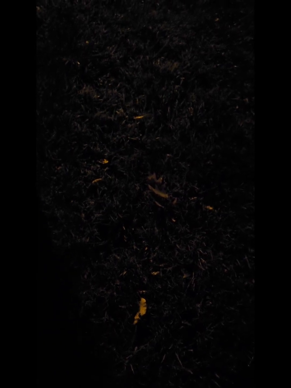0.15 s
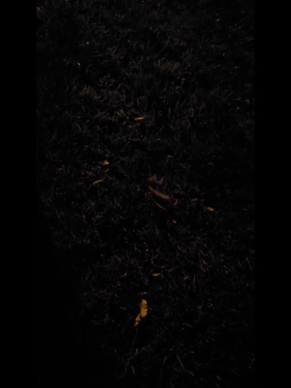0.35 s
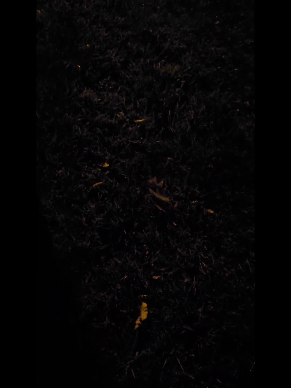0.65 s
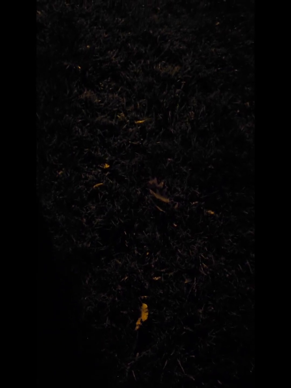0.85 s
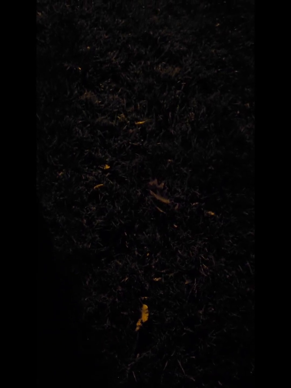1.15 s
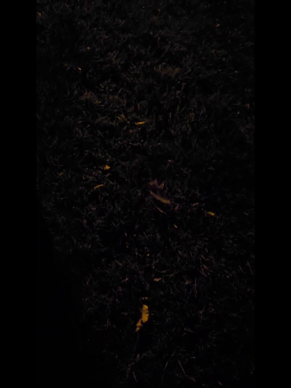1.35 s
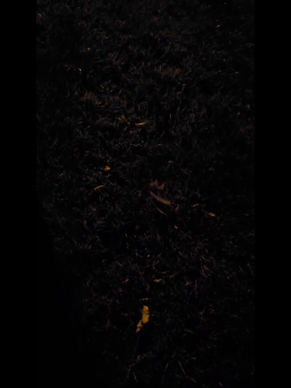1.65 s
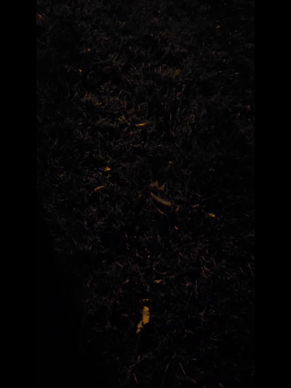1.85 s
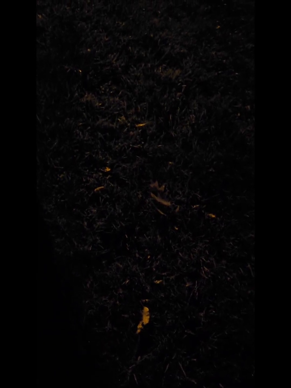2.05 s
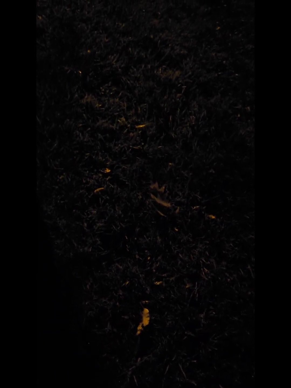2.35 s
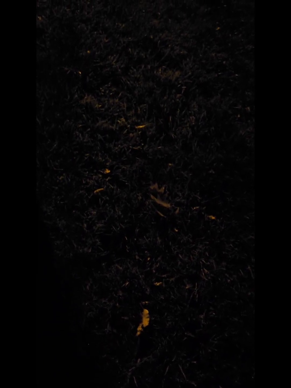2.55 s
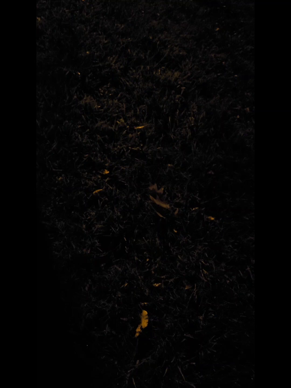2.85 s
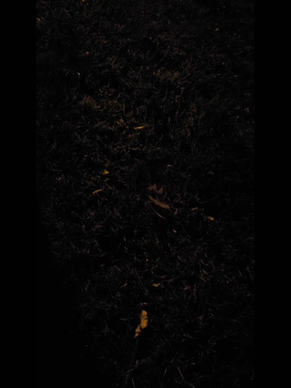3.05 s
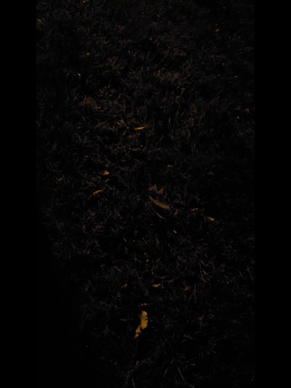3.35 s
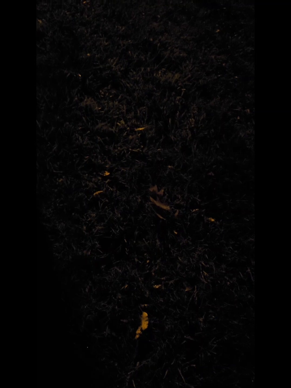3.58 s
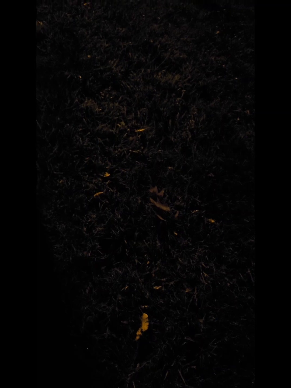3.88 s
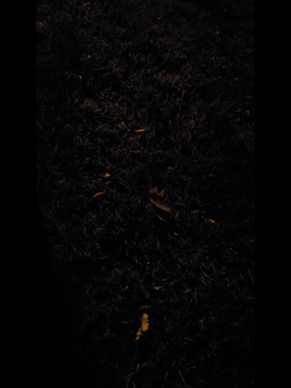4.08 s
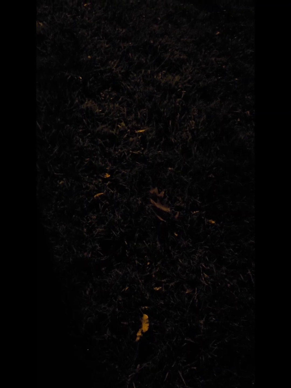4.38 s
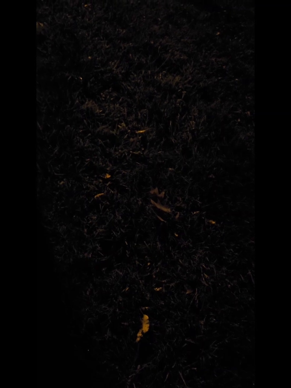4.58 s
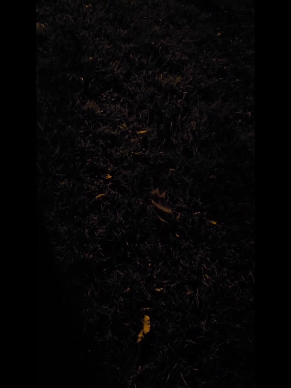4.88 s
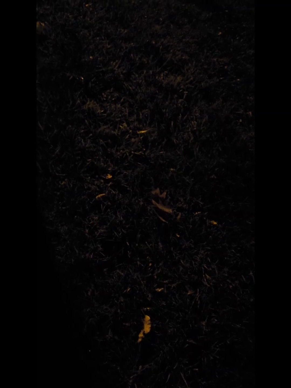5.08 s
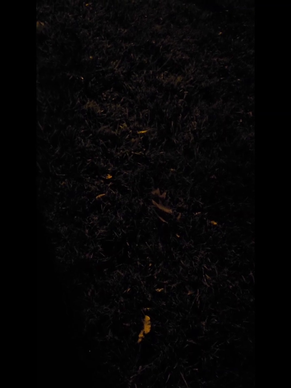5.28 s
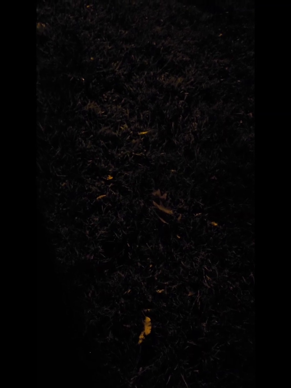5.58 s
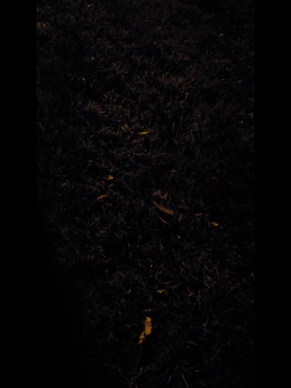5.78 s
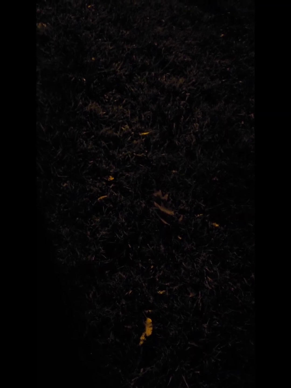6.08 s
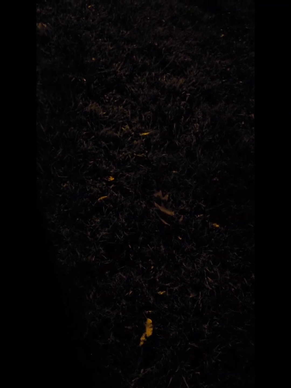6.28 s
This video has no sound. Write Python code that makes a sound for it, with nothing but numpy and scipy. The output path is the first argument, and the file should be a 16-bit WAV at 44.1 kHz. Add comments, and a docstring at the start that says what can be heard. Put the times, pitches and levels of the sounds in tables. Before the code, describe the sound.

Crickets trill and chirp at high pitch on a night lawn while a light breeze buffets the microphone with a low, uneven rumble.

```python
"""A lawn at night. A near cricket scrapes its wings in stuttering bouts, each stroke a falling whistle
near 4.8 kHz. Two small crickets chirp higher up, another trills far to the left, insect choruses and
tree crickets drone, and a distant katydid rasps in pairs. Light gusts buffet the two microphone ports
unevenly, and dry grass ticks over a faint far rumble and a road hum that comes and goes."""
import sys
import numpy as np
from scipy import signal
from scipy.fft import rfft, irfft, next_fast_len
from scipy.io import wavfile
from scipy.ndimage import map_coordinates

SR = 44100
rng = np.random.default_rng(int(sys.argv[2]) if len(sys.argv) > 2 else 0)


def to_wav(s):
    """Save 16-bit WAV."""
    ch = np.atleast_2d(s).T  # columns
    pcm = np.round(np.clip(ch, -1, 1) * 32767)  # PCM
    wavfile.write(sys.argv[1], SR, pcm.astype(np.int16))


N = 283563
TIME = np.arange(N) / SR


def amp(db):
    """Decibels to gain."""
    return 10 ** (np.asarray(db) / 20)


def unit(x):
    """Scale to rms 1."""
    return x / np.sqrt(np.mean(x ** 2) + 1e-20)


def along(points, hz):
    """Read (frequency, value) points on a log frequency axis."""
    freqs, values = np.transpose(points)
    return np.interp(np.log(hz + 1), np.log(freqs + 1), values)


def fader(points):
    """Ride a level through (time, level) points, one value a sample."""
    return np.interp(TIME, *np.transpose(points))


def wobble(rate):
    """A smooth random curve, rate knots a second."""
    knots = rng.standard_normal(int(N * rate / SR) + 4)
    fine = np.arange(0, len(knots) - 1, .125)
    return np.interp(TIME * rate, fine, map_coordinates(knots, [fine]))


def swells(times, levels_db, width_s):
    """Bell-shaped envelopes at the given times."""
    envelope = np.zeros(N)
    for s, db in zip(times, levels_db):
        i = np.arange(max(int((s - 5 * width_s) * SR), 0), min(int((s + 5 * width_s) * SR), N))
        envelope[i] += amp(db) * np.exp(-.5 * ((i / SR - s) / width_s) ** 2)
    return envelope


def filtered(x, response):
    """Pass x through a complex frequency response."""
    size = next_fast_len(N + 4096, real=True)
    return irfft(rfft(x, size) * response(np.fft.rfftfreq(size, 1 / SR)), size)[..., :N]


def noise(spectrum):
    """Two unrelated noises of rms 1, rolling off steeply past the spectrum's ends."""
    low_hz, high_hz = spectrum[0][0], spectrum[-1][0]
    skirts = lambda hz: 1 / (1 + (low_hz / (hz + 1)) ** 8) / (1 + (hz / high_hz) ** 16)
    return unit(filtered(rng.standard_normal((2, N)), lambda hz: amp(along(spectrum, hz)) * skirts(hz)))


def pan(balance_db):
    """Left and right gains; positive leans left."""
    return amp(np.array([[.5], [-.5]]) * balance_db)


def delay(hz, lag_samples):
    """Left and right responses for a sound that reaches the left port later."""
    turn = np.exp(-1j * np.pi * hz / SR * lag_samples)
    return np.array([turn, turn.conj()])


def arrive(x, lag_samples):
    """A sound from one side reaches the far port later (positive: left is later)."""
    return filtered(x, lambda hz: delay(hz, lag_samples))


def from_left(pair, direct):
    """Far sound: a direct share that reaches the left port first, the rest diffuse."""
    left, right = arrive(pair[0], lag_samples=-21)
    return np.array([left, direct * right + np.sqrt(1 - direct ** 2) * pair[1]])


def scatter(x, t60, wet_db):
    """Add the diffuse answer of grass and bushes, different at each port."""
    t = np.arange(SR // 3) / SR
    tail = rng.standard_normal((2, len(t))) * amp(-60 * t / t60)
    echo = signal.fftconvolve(x, tail, axes=1)[:, :N]
    return x + amp(wet_db) * unit(echo) * np.sqrt(np.mean(x ** 2))


def strokes(rows, fall, edge):
    """Envelope and phase of wing strokes: the wing slows as it closes, so the pitch falls."""
    # rows: (middle [s], length [s], pitch [Hz], level [dB])
    rows = rows[np.argsort(rows[:, 0])]
    borders = (rows[1:, 0] + rows[:-1, 0]) / 2
    middle, length, hz, db = rows[np.searchsorted(borders, TIME)].T
    travel = np.clip(2 * (TIME - middle) / length, -1, 1)
    envelope = amp(db) * np.abs(np.cos(np.pi / 2 * travel)) ** edge
    pitch = hz * (1 - fall * (travel + .3 * travel ** 2))
    return envelope, 2 * np.pi * np.cumsum(pitch) / SR


# colour of the far rumble and of a far insect's sizzle: (frequency [Hz], density [dB])
RUMBLE_EQ = [(25, -48), (55, -1), (90, -8), (150, -7.5), (215, -11.5), (265, -11), (300, -15.5), (350, -18),
             (550, -21.5), (800, -26), (1200, -26), (1700, -31.5), (2700, -34), (3600, -62), (9000, -48)]
SIZZLE_EQ = [(3000, -22), (9000, -7.5), (13000, -2), (14500, 5), (15500, 16)]
# how alike the rumble is at the two ports: (frequency [Hz], correlation [-1 to 1])
RUMBLE_LIKENESS = [(40, 0.82), (150, 1), (300, 0.86), (600, 0.52), (1200, -0.14), (2500, -0.45)]
# the rumble's slow ebb: (time [s], level [dB])
RUMBLE_FADER = [(0, -50.5), (1.4, -51.5), (4.2, -52), (6.43, -53.5)]


def night_bed():
    """A far rumble, centred in the bass, and a far insect's faint, very high sizzle to the left."""
    def mid_side(hz):
        angle = np.arccos(along(RUMBLE_LIKENESS, hz)) / 2
        return np.array([np.cos(angle), np.sin(angle)])
    mid, side = filtered(noise(RUMBLE_EQ), mid_side)
    rumble = amp(fader(RUMBLE_FADER) + 1.33 * wobble(4.84)) * unit(np.array([mid + side, mid - side]))
    return rumble + amp(-70.5) * noise(SIZZLE_EQ) * pan(7.6)


# the road hum comes and goes: (time [s], level [dB])
HUM_FADER = [(0, -67.5), (3.9, -74.5), (4.4, -64), (5.0, -60.5), (5.3, -75), (6.43, -74)]


def road_hum(hum_hz=301):
    """A wavering low note from distant traffic, alike at both ports."""
    phase = 2 * np.pi * hum_hz * TIME + 1.65 * wobble(18)
    return amp(fader(HUM_FADER)) * unit(amp(2.1 * wobble(16)) * np.sin(phase))


def far_trill(pitch_hz, period_s, fall, wet_db):
    """An unbroken run of wing strokes at rms 1, blurred by distance."""
    beats = np.arange(0, N / SR + period_s, period_s)
    late, sharp, loud = rng.standard_normal((len(beats), 3)).T
    lengths = np.full(len(beats), .68 * period_s)
    rows = np.c_[beats + .0015 * late, lengths, pitch_hz * (1 + .01 * sharp), 1.5 * loud]
    envelope, phase = strokes(rows, fall, edge=0.28)
    return unit(scatter(pan(0) * envelope * np.sin(phase), t60=0.15, wet_db=wet_db))


# colour of the two far choruses: (frequency [Hz], density [dB])
HIGH_CHORUS_EQ = [(3500, -22.5), (4200, -18), (4800, -8.5), (5250, -13), (5550, -8.5), (5900, -1),
                  (6080, -1.5), (6350, -26), (6700, -25.5), (7400, -15), (8600, -37)]
LOW_CHORUS_EQ = [(1600, -4), (1950, -8.5), (2140, 3.5), (2290, -6), (2460, 3.5), (2650, -0.5),
                 (2850, -11.5), (3150, -3), (3450, -12)]
# trills within the high chorus: (pitch [Hz], stroke period [s], level against the chorus [dB])
CHORUS_TRILLS = [(5940, 0.017, -2), (5600, 0.023, -2.5)]
# the high chorus sinks where its singers pause: (time [s], relative level [dB])
HIGH_CHORUS_FADER = [(0, -60), (0.55, -58), (0.75, -63.5), (0.9, -57), (1.05, -64.5), (1.27, -58),
                     (1.43, -67.5), (1.6, -57), (1.78, -63), (1.95, -58.5), (3.7, -60), (4.7, -61),
                     (5.75, -62), (6.43, -62)]


def choruses():
    """Many far insects merge into two shimmering bands; two trills stand a little out of the high one."""
    shimmer = amp(0.5 + 0.86 * wobble(16) + 3.3 * wobble(100))
    high = shimmer * from_left(noise(HIGH_CHORUS_EQ), direct=0.6)
    for hz, period_s, db in CHORUS_TRILLS:
        high += amp(db + 0.7 * wobble(13)) * far_trill(hz, period_s, fall=.025, wet_db=12)
    low_gain = amp(-66 + 0.91 * wobble(4.86) + 0.88 * wobble(60))
    low = low_gain * from_left(noise(LOW_CHORUS_EQ), direct=0.39)
    return amp(fader(HIGH_CHORUS_FADER)) * high * pan(-1.8) + low * pan(-9)


# one held note for each tree cricket: (pitch [Hz], relative level [dB])
TREE_NOTES = [(2983, -69.5), (3074, -65), (3170, -70.5)]


def tree_crickets():
    """Thin, slightly unsteady notes from far to the left."""
    notes = np.zeros(N)
    for hz, db in TREE_NOTES:
        flutter = amp(2.5 * wobble(15) + 3 * wobble(70))
        notes += amp(db - 3.5) * unit(flutter * np.sin(2 * np.pi * hz * TIME + 1.2 * wobble(30)))
    return arrive(notes, lag_samples=-20.5)


# the far cricket fades away and comes back: (time [s], relative level [dB])
FAR_CRICKET_FADER = [(0, -60), (1.6, -78), (3.8, -61.5), (4.8, -65), (5.7, -66), (6.43, -63)]


def far_cricket():
    """A cricket of the near one's kind trills farther off to the left."""
    trill = far_trill(pitch_hz=4970, period_s=.0213, fall=.05, wet_db=-6)
    return amp(fader(FAR_CRICKET_FADER) - 1.5) * pan(9) * trill


# gusts on the ports: (start [s], end [s], left level [dB], right level [dB])
GUST_CUES = [(0, .29, -32, -30.5), (.085, .17, -20, -26), (0.306, .62, -41, -35), (0.496, 0.833, -32, -41),
             (0.818, 1.25, -38.5, -46), (1.277, 1.63, -41.5, -42.5), (1.998, 2.82, -40, -58),
             (2.853, 3.401, -39, -39), (3.424, 3.657, -39.5, -31.5), (3.675, 3.919, -41.5, -45.5),
             (4.081, 4.745, -41.5, -45.5), (4.391, 4.523, -30.5, -50), (5.5, 6.305, -52, -46.5),
             (5.904, 6.0, -40, -56), (6.308, 6.409, -39.5, -41)]
# sharp eddies that thud on a port: (time [s], level [dB], left minus right [dB])
THUD_CUES = [(.085, -39, 11), (0.583, -38.5, 15), (0.712, -36.5, 9.5), (0.778, -41, 15.5), (0.908, -38, 8),
             (2.987, -35, 15.5), (3.179, -38, 16), (3.501, -42, -4)]
# colour of the buffeting and of the thuds: (frequency [Hz], density [dB])
BUFFET_EQ = [(20, -27), (32, -10), (48, 2.5), (66, 3.5), (95, -5.5), (145, -11), (190, -23.5), (280, -21.5),
             (360, -33), (600, -50)]
THUD_EQ = [(70, 12), (130, 6.5), (240, 1), (330, -19), (600, -41)]


def breeze(ramp_s=0.051, calm_db=-52.5, lump_db=2.3, thud_width_s=0.0095):
    """Gusts rise, hold and fall; their eddies strike each port on its own, and the sharpest thud."""
    power = amp(calm_db) ** 2  # the air still stirs between gusts
    for start, end, left_db, right_db in GUST_CUES:
        hold = np.clip(np.minimum(TIME - start, end - TIME) / ramp_s + .5, 0, 1)
        power = power + (amp([[left_db], [right_db]]) * hold) ** 2
    lumps = amp(lump_db * np.array([wobble(16), wobble(16)]))
    buffet = np.sqrt(power) * unit(lumps * noise(BUFFET_EQ))
    times, db, balance_db = np.transpose(THUD_CUES)
    thuds = np.array([swells(times, db + side * balance_db, thud_width_s) for side in (.5, -.5)])
    return buffet + thuds * noise(THUD_EQ)


# the near cricket's run lengths, each entry equally likely: (length [strokes])
STROKES_PER_RUN = [2, 2, 3, 3, 3, 3, 3, 4, 4, 4, 5, 6]
STROKE_GAP_S, HITCH_S = 0.018, 0.011  # nominal spacing within a run; extra pause between runs


def stroke_times(first, last):
    """A bout is a chain of short runs of evenly spaced strokes, with an uneven hitch after each run."""
    runs = rng.choice(STROKES_PER_RUN, size=60)
    hitches = np.cumsum(HITCH_S * rng.uniform(.5, 1.5, size=60))
    offsets = np.arange(runs.sum()) * STROKE_GAP_S + np.repeat(hitches - hitches[0], runs)
    final = max(np.argmin(np.abs(offsets - (last - first))), 1)
    return first + offsets[:final + 1] * (last - first) / offsets[final]  # stretched to fill the bout


# bouts of the near cricket's trill: (first stroke [s], last stroke [s])
TRILL_BOUTS = [(0.02, 0.949), (1.633, 1.653), (1.788, 3.762), (3.905, 4.718), (4.869, 5.161),
               (5.251, 5.632)]
# how hard it sings: (time [s], relative stroke level [dB])
TRILL_EFFORT = [(0, -34.5), (0.95, -34), (1.63, -37.5), (1.8, -39), (2.05, -34.5), (3.3, -34.3),
                (3.76, -34), (3.9, -38), (4.05, -34.5), (4.45, -36), (4.68, -38.5), (4.9, -39.5),
                (5.05, -35.5), (5.63, -35)]
# harmonics of its wing: (multiple [x pitch], relative level [dB], left minus right [dB])
WING_HARMONICS = [(1, 0.5, 1.7), (2, -23.5, 2), (3, -18, 12.5)]
# colour of file on scraper: (frequency [Hz], density [dB])
SCRAPE_EQ = [(3400, -24.5), (4100, -14.5), (4700, 0), (5900, 5.5), (6700, -9), (7500, -9.5), (8800, -17),
             (10600, -15.5), (11900, -10.5), (13200, -17), (14600, -8), (15800, -9)]
# the scrape's treble favours the left port: (frequency [Hz], left minus right [dB])
SCRAPE_PAN = [(9800, 3), (12000, 1.5), (14500, 14)]
# the song bends round the microphone's housing: (frequency [Hz], lag of the left port [samples])
HOUSING_LAG = [(4800, 10.1), (5200, 11.35), (9600, 11.45), (14500, 11.3)]


def near_cricket(stroke_hz=4820, length_s=0.0114, sag_per_db=0.004, slip_db=2.4):
    """Wing strokes whistle, and a few slip; uneven file teeth roughen the tone and add a scrape."""
    beats = np.concatenate([stroke_times(first, last) for first, last in TRILL_BOUTS])
    late, stretch, sharp, slip = rng.standard_normal((500, 4))[:len(beats)].T
    db = np.interp(beats, *np.transpose(TRILL_EFFORT)) - slip_db * (np.abs(slip) - 1)
    # weak strokes are also shorter and lower
    effort_db = db - np.median(db)
    lengths = np.minimum(length_s * amp(0.344 * effort_db + 1.1 * stretch), STROKE_GAP_S)
    pitches = stroke_hz * (1 + sag_per_db * np.minimum(effort_db, 0) + 0.005 * sharp)
    envelope, phase = strokes(np.c_[beats + .0007 * late, lengths, pitches, db], fall=.046, edge=0.66)
    # grit from the uneven teeth
    phase += .14 * wobble(1100)
    envelope *= amp(1.65 * wobble(450))
    whistle = sum(amp(level - 0.4) * pan(side) * np.sin(k * phase) for k, level, side in WING_HARMONICS)
    scrape = amp(-18) * filtered(noise(SCRAPE_EQ)[0], lambda hz: pan(along(SCRAPE_PAN, hz)))
    song = filtered(envelope * (whistle + scrape), lambda hz: delay(hz, along(HOUSING_LAG, hz)))
    # the ground's answer is short, the bushes' lingers
    grounded = scatter(song, t60=0.017, wet_db=-13)
    return scatter(grounded, t60=0.18, wet_db=-11.5)


# katydid calls: (middle of the first rasp [s], relative level [dB])
KATYDID_CUES = [(.095, -54.5), (1.0, -55.5), (1.975, -56.5), (2.78, -56), (3.605, -55.5), (4.474, -56),
                (5.395, -55.5), (6.321, -56.5)]
# colour of a rasp: (frequency [Hz], density [dB])
RASP_EQ = [(1400, -25), (1780, -3.5), (2150, -3.5), (2500, -6), (2900, -10.5), (3300, -14)]


def katydid(width_s=0.047, gap_s=0.18):
    """Paired rasps from far off, their edges softened by the trees."""
    times, db = np.transpose(KATYDID_CUES)
    pairs = swells(times, db, width_s) + swells(times + gap_s, db, width_s)
    envelope = pairs * amp(-5 + 0.37 * wobble(130))
    return envelope * from_left(noise(RASP_EQ), direct=0.32) * pan(-4.5)


def chirper(starts, pitch_hz, period_s, fall, balance_db, wet_db, count=7):
    """A small cricket: every chirp is a swelling burst of quick strokes."""
    k = np.arange(count)
    swell_db = 5 * (np.sin(np.pi * (k + 1) / (count + 1)) - 1)
    chirps = []
    for start in starts:
        pitches = pitch_hz * (1 + .005 * rng.standard_normal(count))
        db = swell_db + .8 * rng.standard_normal()
        chirps.append(np.c_[start + k * period_s + .004, np.full(count, period_s), pitches, db])
    envelope, phase = strokes(np.vstack(chirps), fall, edge=0.85)
    song = arrive(envelope * np.sin(phase + .4 * wobble(1300)), lag_samples=-6)
    return scatter(pan(balance_db) * song, t60=0.2, wet_db=wet_db)


# chirps of the higher and the lower small cricket: (start [s])
HIGH_CHIRP_CUES = [.11, .46, .8, 1.13, 1.46, 1.8, 2.1, 2.38, 2.68, 2.98, 3.26, 3.58, 3.85, 4.14, 4.43,
                   4.729, 5.02, 5.31, 5.59, 5.92, 6.25]
LOW_CHIRP_CUES = [.22, .55, .89, 1.26, 1.64, 1.941, 2.25, 2.57, 2.9, 3.21, 3.49, 3.78, 4.09, 4.42, 4.72,
                  5.031, 5.37, 5.731, 6.04, 6.35]
# how loudly the lower one sings: (time [s], relative level [dB])
LOW_CHIRP_FADER = [(0.2, -55.5), (1.6, -58.5), (2.0, -56), (2.9, -53.5), (3.8, -59), (4.45, -55.5),
                   (5.1, -60.5), (6.43, -56.5)]


def small_crickets():
    """Two small crickets left of centre, each chirping about three times a second at its own pace."""
    low = chirper(LOW_CHIRP_CUES, pitch_hz=7813, period_s=.0122, fall=0.033, balance_db=3.5, wet_db=-2)
    high = chirper(HIGH_CHIRP_CUES, pitch_hz=8010, period_s=.0125, fall=0.016, balance_db=7, wet_db=-3)
    return amp(fader(LOW_CHIRP_FADER)) * low + amp(-64.3) * high


# dry ticks in the grass: (time [s], level [dB])
TICK_CUES = [(.987, -61), (1.125, -68), (4.692, -63)]
# colour of a tick: (frequency [Hz], density [dB])
TICK_EQ = [(3000, 1), (6000, -10), (12000, 7), (15800, -5)]


def grass_ticks(width_s=0.0017):
    """Dry blades snap faintly."""
    return swells(*np.transpose(TICK_CUES), width_s) * noise(TICK_EQ)


def scene():
    """The mix: insects near and far, breeze and grass, over the road hum and the night bed."""
    chirps = small_crickets()
    far_insects = far_cricket() + choruses() + tree_crickets() + katydid()
    return near_cricket() + chirps + far_insects + breeze() + grass_ticks() + road_hum() + night_bed()


def record(dry, top_hz=15870):
    """A brick-wall low-pass takes off the very top."""
    return filtered(dry, lambda hz: hz < top_hz)


dry = scene()
out = record(dry)
to_wav(out)
```